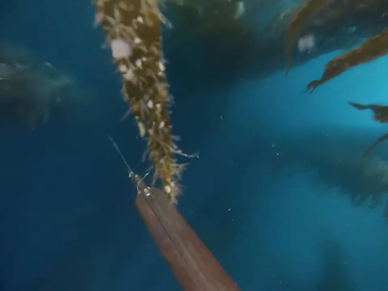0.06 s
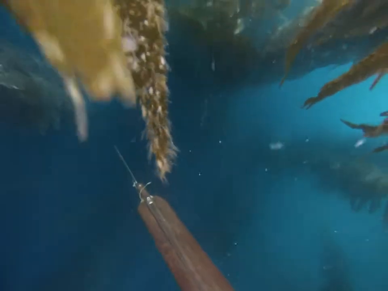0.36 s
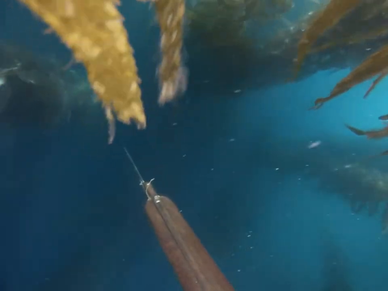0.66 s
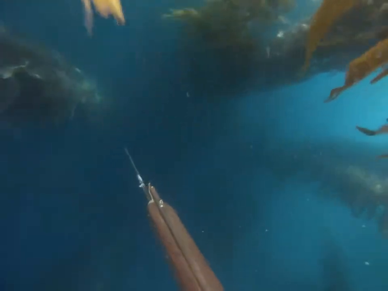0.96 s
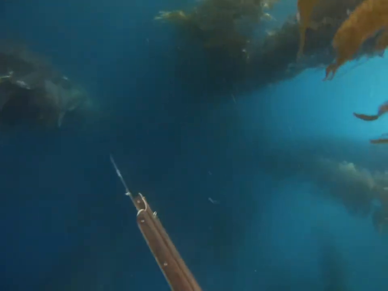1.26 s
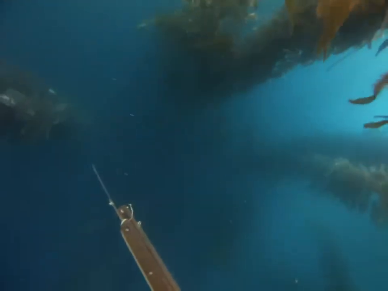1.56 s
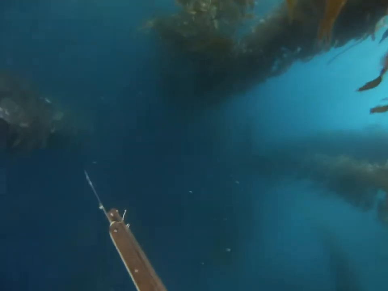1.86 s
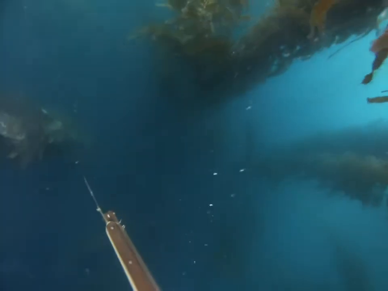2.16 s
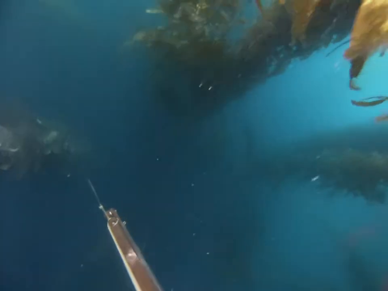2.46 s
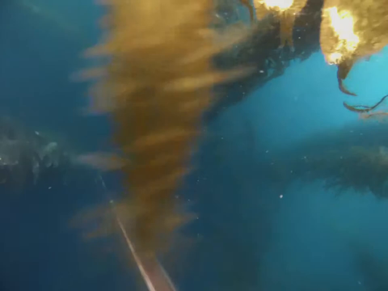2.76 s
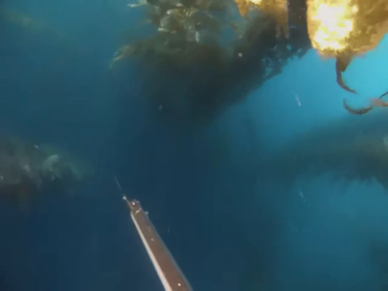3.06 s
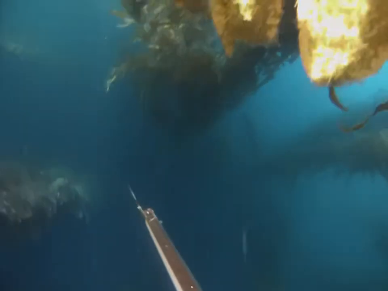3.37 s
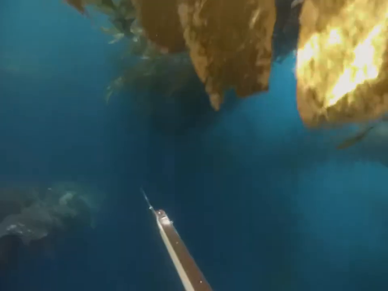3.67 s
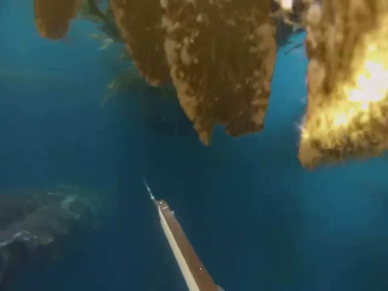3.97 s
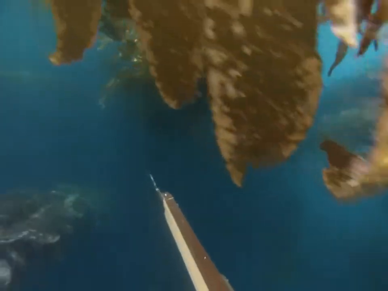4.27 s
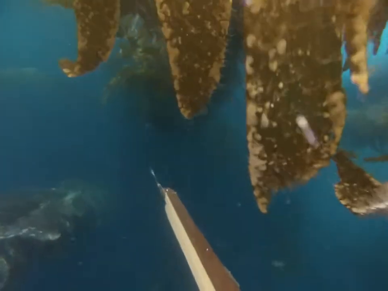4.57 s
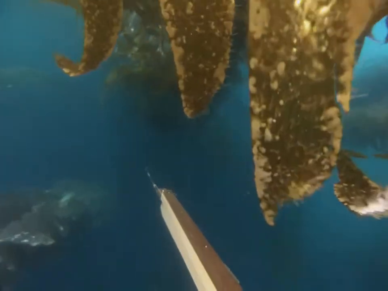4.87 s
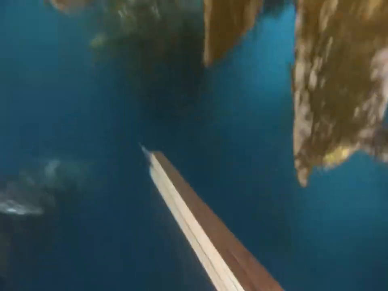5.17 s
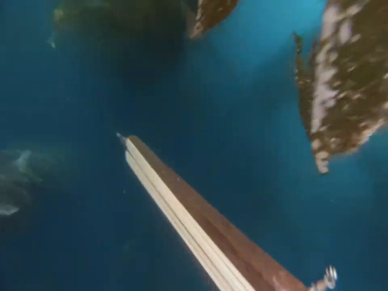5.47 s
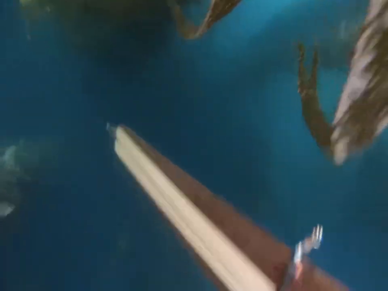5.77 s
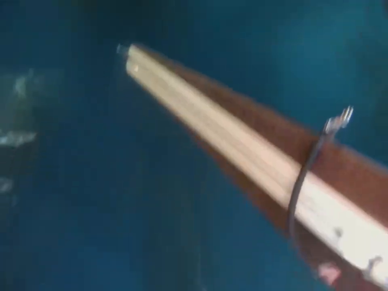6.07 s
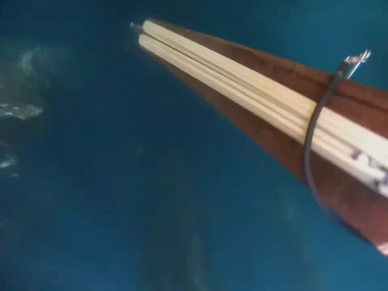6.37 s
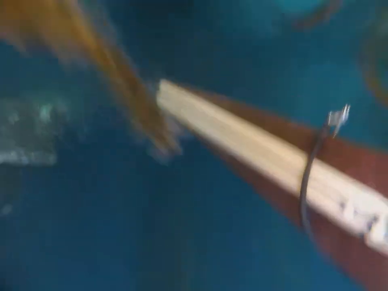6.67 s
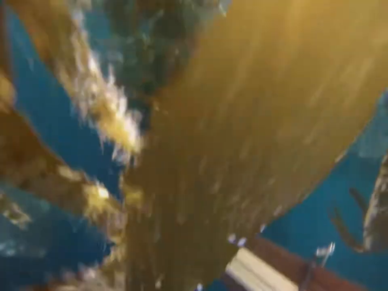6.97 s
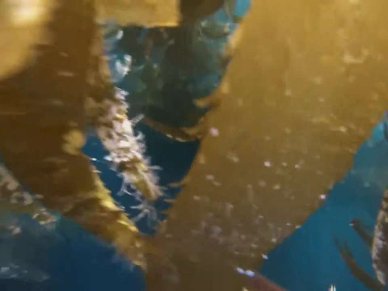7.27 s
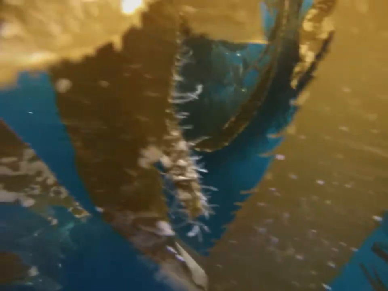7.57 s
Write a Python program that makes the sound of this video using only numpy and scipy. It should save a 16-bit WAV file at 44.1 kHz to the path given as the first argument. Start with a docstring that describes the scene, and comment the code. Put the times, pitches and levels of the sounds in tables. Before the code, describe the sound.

Underwater in a kelp forest, heard from inside a camera housing. Water rumbles and gurgles softly while snapping shrimp fizz and click all around, a few snaps sharp and close. A frond patters and brushes over the case, squeezing out bubbles. Later the flow surges, a speargun gives deep thumps and knocks, and a stiff kelp blade scrapes along the case before the water eases.

```python
"""A diver with a wooden speargun glides through a kelp forest, heard from inside a camera housing.
From the start water rumbles and gurgles past and snapping shrimp crackle all around; soft bumps and
bubbly swirls drift in. Just after 2 s a frond patters and brushes over the case, squeezing out bubbles.
From 5 s the flow surges, and around 6 s the gear thumps and knocks as the gun is drawn in.
Near 7 s a stiff kelp blade scrapes along the case, then the water eases under the shrimp."""
import sys
import numpy as np
from scipy import signal
from scipy.fft import rfft, irfft
from scipy.io import wavfile

SR = 44100
rng = np.random.default_rng(int(sys.argv[2]) if len(sys.argv) > 2 else 0)


def to_wav(sig):
    """Store sig (one row per channel, or 1-D mono) as 16-bit WAV at the path in sys.argv[1].

    Samples outside -1..1 are clipped; the rate is SR.
    """
    pcm = np.clip(np.atleast_2d(sig), -1, 1) * 32767
    pcm = np.round(pcm).astype(np.int16)
    wavfile.write(sys.argv[1], SR, pcm.T)  # frames by channels


N = 336483


def from_db(db):
    """Decibels to gain."""
    return 10 ** (np.asarray(db) / 20)


def rms_one(x):
    """Scale to unit rms."""
    return x / np.sqrt(np.mean(x ** 2) + 1e-20)


def peak_one(x):
    """Scale to unit peak."""
    return x / (np.abs(x).max() + 1e-20)


def add(out, s, sound):
    """Mix a sound in at s seconds."""
    start = max(round(s * SR), 0)
    out[start:start + len(sound)] += sound[:N - start]


def automation(points):
    """A fader ride: straight lines between (time, level) points."""
    return np.interp(np.arange(N) / SR, *np.transpose(points))


def band(x, hz, kind="band", order=2):
    """Butterworth filter."""
    return signal.sosfilt(signal.butter(order, np.minimum(hz, .45 * SR), kind, fs=SR, output="sos"), x)


def colour(x, curve, size=8192):
    """Minimum-phase EQ through (frequency, level) points."""
    hz, db = np.transpose(curve)
    log_hz = np.log(np.maximum(np.arange(size // 2 + 1) * SR / size, 1))
    cepstrum = irfft(np.log(from_db(np.interp(log_hz, np.log(hz), db))))
    cepstrum[1:size // 2] *= 2
    cepstrum[size // 2 + 1:] = 0
    return signal.fftconvolve(x, irfft(np.exp(rfft(cepstrum))))[:len(x)]


def resonance(x, hz, width):
    """Two-pole resonance with unit gain at its peak."""
    r = np.exp(-np.pi * width / SR)
    poles = [1, -2 * r * np.cos(2 * np.pi * hz / SR), r * r]
    return signal.lfilter(np.array([1, 0, -1]) * (1 - r * r) / 2, poles, x)


def drift(hz):
    """Smooth random modulation, rms about 1."""
    hop, settle = 40, 2000
    r = np.exp(-2 * np.pi * hz * hop / SR)
    noise = rng.standard_normal(N // hop + settle + 2)
    slow = signal.lfilter([1], [1, -2 * r, r * r], noise)[settle:]
    return np.interp(np.arange(N) / hop, np.arange(len(slow)), rms_one(slow))


def lumpy(x, depth_db, rate_hz):
    """Make a sound swell and sink at random; rms 1."""
    return rms_one(x * from_db(depth_db * np.clip(drift(rate_hz), -2, 2)))


def grains(per_s, spread_db, largest):
    """Random clicks, many small and a few large."""
    sizes = from_db(spread_db * np.minimum(rng.exponential(1, N), largest)) * rng.choice([-1, 1], N)
    return sizes * (rng.random(N) < per_s / SR)


def dying_noise(t60, size=6000):
    """A tail of reflections with unit energy."""
    tail = rng.standard_normal(size) * from_db(-60 * np.arange(size) / SR / t60)
    return tail / np.linalg.norm(tail)


def click(scatter_db, t60):
    """A direct pressure dip and its close reflections."""
    pulse = from_db(scatter_db) * dying_noise(t60)
    pulse[0] -= 1
    return pulse


def with_treble(x, treble_db, split_hz, order):
    """Balance a hit's top end against its body; peak 1."""
    body = peak_one(band(x, split_hz, "low", order))
    treble = peak_one(band(x, split_hz, "high", order))
    return peak_one(body + from_db(treble_db) * treble)


# Strength of the flow past the housing: t/s, level/dB
FLOW_RIDE = [(0.0, -56), (0.25, -58), (0.66, -50.5), (1.1, -53), (2.21, -55.5), (2.42, -49.5), (2.7, -49),
             (3.16, -50), (3.8, -51), (4.0, -49.5), (5.04, -47), (5.5, -37.5), (5.91, -42.5), (6.18, -35),
             (6.61, -39), (6.89, -31.5), (7.25, -46), (7.63, -44.5)]
# EQ of the rolling low end: f/Hz, level/dB
RUMBLE_EQ = [(14, -23.5), (24, -3), (43, -7.5), (70, -6.5), (107, -16), (140, -15), (170, -18),
             (240, -26.5), (370, -80.5)]
# EQ of the throaty midrange gurgle: f/Hz, level/dB
GURGLE_EQ = [(220, -40.5), (380, 6.5), (480, 5.5), (720, 7.5), (950, 0), (1250, -0.5), (1500, -1.5),
             (2000, -60.5)]
def water():
    """The current rocks the case, rumbles, sheds eddies and gurgles round the gear, rising with flow."""
    surge_db = automation(FLOW_RIDE) + 50  # 0 dB is a steady glide
    white = rng.standard_normal((3, N))
    sway = rms_one(band(white[0], [9, 17]))
    rumble = lumpy(colour(white[1], RUMBLE_EQ), depth_db=2.5, rate_hz=31)
    eddies = lumpy(band(white[2], [142, 310]), depth_db=7, rate_hz=74)
    pops = grains(per_s=4000, spread_db=3.5, largest=1.33)
    gurgle = lumpy(colour(pops, GURGLE_EQ), depth_db=2.5, rate_hz=37)
    return (from_db(-38.5 + .55 * surge_db) * sway
            + from_db(-45 + .79 * surge_db) * rumble
            + from_db(-59 + .9 * surge_db) * eddies
            + from_db(-63 + .43 * surge_db) * gurgle)


# Fader ride of the distant shrimp: t/s, level/dB
SHRIMP_RIDE = [(0, 1), (1.9, 1), (3.0, 2.5), (3.7, 2), (4.5, 1.5), (5.2, 1.5), (6.4, 3.5), (7.63, 0)]
# EQ of their fizz and crackle: f/Hz, level/dB
SHRIMP_EQ = [(590, -25.5), (1000, -8), (1380, -15.5), (1600, 0), (2000, -4), (2310, 2), (2740, -10.5),
             (3700, -7.5), (4790, -16.5), (5360, -7), (6130, -14), (7090, -9), (8380, -19), (10700, -14.5),
             (14500, -23.5)]
def shrimp_bed():
    """Countless far snaps merge into a fizz; nearer ones stand out in flurries of crackle."""
    far_snaps = rms_one(colour(grains(per_s=5000, spread_db=2.8, largest=3), SHRIMP_EQ))
    fizz = from_db(-60.5) * lumpy(far_snaps, depth_db=2, rate_hz=46)
    flurries = from_db(-63.5) * lumpy(crackle(SHRIMP_EQ), depth_db=3.5, rate_hz=5.6)
    return from_db(automation(SHRIMP_RIDE)) * band(fizz + flurries, 12100, "low", order=4)


def crackle(eq):
    """Mid-distance snaps: soft ticks coloured by direction, many faint and a few clear; rms 1."""
    ticks = [peak_one(band(colour(click(scatter_db=7, t60=.018), eq), [hz / 1.7, hz * 1.7]))
             for hz in np.geomspace(1800, 9000, num=40)]
    out = np.zeros(N)
    for when, direction, faintness in rng.random((1100, 3)):
        db = 4.6 * min(-np.log(faintness), 2.6)
        add(out, when * (N - 1) / SR, from_db(db) * ticks[int(direction * len(ticks))])
    return rms_one(out)


# Foreground shrimp snaps: t/s, peak level/dB, treble re body/dB, ring tilt/(dB per octave)
SNAP_CUES = [(0.0656, -34.5, -2, -3), (0.106, -40.5, 5, 4), (0.4592, -16.5, -14, 1), (0.6587, -39.5, 3, 2),
             (0.694, -43.5, 7, 8), (0.7434, -43.5, 10, 11), (0.8153, -39, 4, 9), (0.844, -42.5, -4, -18),
             (1.122, -30, -14, -7), (1.166, -32, -7, 19), (1.193, -23.5, -19, -2), (1.276, -41, -1, 1),
             (1.4716, -38, -7, 11), (1.73, -39, -9, 6), (1.8455, -33.5, -17, 0), (1.9449, -40, -19, -10),
             (2.0168, -37.5, -11, -3), (2.0982, -35, -19, 2), (2.841, -38.5, -7, -1), (2.9405, -37, 1, -19),
             (2.963, -16, -24, 5.5), (2.9924, -30.5, -7.5, -23), (3.3164, -36, 1, 7),
             (3.5039, -26, -11.5, -11.5), (3.551, -38.5, -5, -13), (3.5811, -36, -12, -1),
             (3.596, -33.5, -11, -9), (3.6152, -35, -5, 13), (3.6385, -35, -25, -20),
             (3.6797, -33.5, -4, 2), (3.7277, -34.5, -20, 1), (3.761, -39, -7, 24),
             (3.862, -24.5, -12, -4.5), (3.9055, -33, 9, 2), (4.0313, -33, 2.5, 2), (4.0518, -34, 3.5, 7),
             (4.182, -34, -22, -1), (4.2842, -31, -5, 2), (4.3025, -35, 3, -4), (4.914, -35, 2.5, 4),
             (5.0152, -38, -2.5, -6), (5.084, -37, -3, 5), (5.1243, -38.5, -4, 5), (5.1685, -35, -13.5, -6),
             (5.29, -25, -12.5, -3), (5.348, -28.5, -4, -2), (5.405, -37, -19, -7),
             (5.4858, -24.5, -31, -3), (5.679, -33.5, -10, 5), (5.689, -32, -19, -7),
             (5.7492, -33.5, -7, -16), (5.83, -32, -8.5, 3), (6.1365, -31, -16, -20),
             (6.1519, -27, -12.5, -11), (6.1752, -32, -7, -22), (6.2506, -40, -8, 10),
             (6.2628, -36.5, -7, -18), (6.3717, -36, 5, 3), (7.1014, -35.5, -8, -10),
             (7.277, -38.5, -6, -9), (7.39, -35.5, -5, 7), (7.448, -28.5, 0, -11),
             (7.5106, -32.5, -6.5, -20)]
def near_snaps():
    """Each claw snap rings the case; fainter ones come from farther off, more scattered by the kelp."""
    out = np.zeros(N)
    nearest_db = max(row[1] for row in SNAP_CUES)
    for s, db, treble_db, tilt_db in SNAP_CUES:
        loss_db = nearest_db - db
        scatter_db = min(-13 + .6 * loss_db, -1)
        pulse = click(scatter_db, t60=.018) + from_db(scatter_db - 5) * dying_noise(t60=.14)
        glitter = band(dying_noise(t60=.054), 3800, "high", order=6)  # short waves scatter most
        spread_db = min(1 + loss_db / 6, 4)
        ring = housing(pulse + from_db(-1.5) * glitter, spread_db, tilt_db)
        front_wall = from_db(-8 - loss_db / 2) * resonance(ring, hz=2290, width=280)
        add(out, s, from_db(db) * with_treble(ring + front_wall, treble_db, split_hz=4350, order=12))
    return out


# Ring of the housing walls: f/Hz, bandwidth/Hz, level/dB
WALL_MODES = [(797, 75, -16), (1647, 170, -1), (2199, 174, 4.5), (2420, 164, 3), (2930, 1000, -9.5),
              (3705, 225, -4), (5360, 405, -11), (7090, 670, -14.5), (9930, 540, -21)]
def housing(x, spread_db, tilt_db):
    """Sound from the water rings the walls; each direction has its own mix, tilted dark or bright."""
    octaves = np.clip(np.log2(np.array(WALL_MODES)[:, 0] / 2300), -1, 2 / 3)
    trim_db = spread_db * rng.uniform(-1.4, 1, len(WALL_MODES)) + tilt_db * octaves
    return sum((-1) ** k * from_db(db + trim_db[k]) * resonance(x, hz, width)
               for k, (hz, width, db) in enumerate(WALL_MODES))


# Soft, bassy bumps through the mount: t/s, peak level/dB, f/Hz
THUMP_CUES = [(0.711, -30, 80), (2.251, -26, 66), (2.271, -33, 109), (2.325, -27, 60), (2.423, -27, 75),
              (3.4, -25, 48.3), (3.879, -25.5, 69.5), (4.019, -32, 159), (4.41, -35, 143),
              (5.57, -31, 69.4), (5.964, -28.5, 86.4), (6.225, -9.5, 109.5), (6.293, -17, 102),
              (6.379, -10.5, 105), (6.438, -13, 98), (6.674, -21, 70), (6.746, -22.5, 69),
              (6.9898, -21, 215), (6.993, -9.5, 61), (7.081, -21.5, 107)]
def thumps(length_s=.013):
    """Soft pushes on the mount swell and die within a few cycles."""
    out, t = np.zeros(N), np.arange(-SR // 10, SR // 10) / SR
    swell = np.exp(-(2 * t / length_s) ** 2)
    for s, db, hz in THUMP_CUES:
        add(out, s + t[0], -from_db(db) * np.cos(2 * np.pi * hz * t) * swell)
    return out


def bubble(hz, cycles, size=2000):
    """A bubble pings and chirps upward, dying by 60 dB in cycles / hz seconds."""
    turns = hz * np.arange(size) / SR
    return np.sin(2 * np.pi * turns * (1 + .15 * turns / cycles)) * from_db(-60 * turns / cycles)


def bubbling(count, hz, octaves, spread_db, cycles, size):
    """Bubbles of assorted sizes born at random moments; rms 1."""
    out = np.zeros(size)
    for when, pitch, faintness in rng.random((count, 3)):
        ring = from_db(-spread_db * faintness) * bubble(hz * 2 ** (octaves * (pitch - .5)), cycles)
        start = int(when * size)
        out[start:start + len(ring)] += ring[:size - start]
    return rms_one(band(out, [hz / 2, hz * 2]))


# Bubbly swirls: t/s, rms level at the crest/dB, f/Hz, length/s, pitch spread/octaves
SWIRL_CUES = [(1.594, -49.5, 1180, 0.035, 2.4), (1.661, -54, 1300, 0.026, 0.85),
              (2.741, -52, 740, 0.066, 1.8), (2.814, -47, 885, 0.01, 2), (3.095, -53, 1240, 0.062, 2.14),
              (4.091, -54, 268, 0.14, 0.64), (4.679, -55.5, 374, 0.25, 1.1),
              (4.415, -54.5, 714, 0.085, 0.39), (4.54, -55.5, 736, 0.092, 0.56),
              (4.683, -45, 700, 0.051, 0.38), (5.32, -55, 634, 0.27, 2.03),
              (5.452, -44.5, 604, 0.026, 0.85), (5.567, -45.5, 730, .02, 1),
              (5.727, -49.5, 750, 0.097, 0.8), (5.916, -53, 755, 0.056, 0.88),
              (6.031, -51, 614, 0.055, 0.65), (6.165, -49.5, 700, 0.14, 0.71),
              (6.487, -50.5, 543, .04, 0.89), (6.598, -49.5, 1150, 0.06, 0.18),
              (6.639, -46.5, 690, 0.06, 0.68), (6.996, -37, 685, 0.011, 0.19), (7.087, -53, 1060, 0.056, 1),
              (7.141, -42, 770, 0.0081, 0.89), (7.207, -55, 1130, 0.066, 0.95)]
def swirls():
    """Eddies churn the water and shake loose clusters of little bubbles, swelling and fading."""
    out, t = np.zeros(N), np.arange(-SR // 5, SR // 5) / SR
    for s, db, hz, length, octaves in SWIRL_CUES:
        cluster = bubbling(count=200, hz=hz, octaves=octaves, spread_db=36, cycles=15.4, size=len(t))
        edges_hz = hz * 2 ** (octaves * np.array([-.5, .5]))
        churn = rms_one(band(rng.standard_normal(len(t)), edges_hz))
        swell = np.exp(-2 * (t / length) ** 2)
        add(out, s + t[0], from_db(db) * rms_one(cluster + from_db(-3.5) * churn) * swell)
    return out


# Kelp pattering on the case: t/s, peak level/dB, treble re body/dB
TAP_CUES = [(2.2268, -34, -16), (2.2513, -23.5, 3), (2.2823, -26, -4), (2.311, -20.5, -3),
            (2.344, -18.5, -7), (2.3786, -22, -1), (2.398, -18, 5), (2.42, -29, -2), (2.4305, -18.5, 0.5),
            (2.4485, -22, -3), (2.478, -21, -3), (2.5135, -20.5, 2), (2.581, -17.5, -5), (6.8624, -26, 5),
            (6.959, -30, 9)]
# EQ of a direct hit on the case: f/Hz, level/dB
TAP_EQ = [(88, 0), (150, 10), (285, 0), (420, -3), (722, -2), (844, -14), (2180, 2), (7710, -29),
          (8490, -33.5), (9600, -27.5), (13000, -40), (15500, -61)]
def kelp_taps():
    """Floats and stalks hit the case directly: a sharp, wide click over a short dull thud."""
    out = np.zeros(N)
    for s, db, treble_db in TAP_CUES:
        pulse = click(scatter_db=-5, t60=.009)
        thud = band(dying_noise(t60=.035), [450, 1600])
        tap = colour(pulse + from_db(3) * thud, TAP_EQ)
        add(out, s, from_db(db) * with_treble(tap, treble_db, split_hz=6040, order=4))
    return out


# Gear and stalks knocking on the case: t/s, peak level/dB, hardness as low-pass f/Hz
KNOCK_CUES = [(2.228, -31, 700), (2.321, -33, 650), (2.3885, -26.5, 800), (2.4175, -29, 600),
              (2.502, -31, 800), (2.556, -32.5, 900), (3.075, -33.5, 900), (4.011, -39, 400),
              (4.128, -39, 348), (4.163, -39, 350), (4.405, -33.5, 500), (5.9548, -19.5, 1080),
              (5.961, -28, 800), (5.9672, -27, 1000), (6.1115, -27, 1000), (6.1315, -26, 1000),
              (6.517, -24.5, 890), (6.9857, -12, 1300)]
# Low modes of the case on its mount: f/Hz, bandwidth/Hz, level/dB
MOUNT_MODES = [(184, 140, 6), (376, 38, -7), (630, 69, -0.5), (1170, 170, -13)]
def knocks():
    """One short push sets the low modes of the case ringing; the water damps them quickly."""
    out = np.zeros(N)
    for s, db, hardness_hz in KNOCK_CUES:
        push = -band(click(scatter_db=-10.5, t60=.013), hardness_hz, "low")
        ring = sum(from_db(mode_db + rng.normal(0, .96)) * resonance(push, hz, width)
                   for hz, width, mode_db in MOUNT_MODES)
        add(out, s, from_db(db) * peak_one(ring))
    return out


def pressing(cues, attack_s=.06, release_s=.042, sag_db_per_s=14):
    """Envelope of a run of contacts: each catches, eases while it holds, and lets go."""
    t, out = np.arange(N) / SR, np.zeros(N)
    for s, length, db in cues:
        away = np.maximum((s - t) / attack_s, (t - s - length) / release_s)
        sag_db = sag_db_per_s * np.clip(t - s, 0, length)
        out = np.maximum(out, from_db(db - sag_db - 60 * np.clip(away, 0, 2)))
    return out


def stick_slip():
    """Rough blades catch and slip: fine slips outnumber coarse ones, each size in its own bursts."""
    out = np.zeros(N)
    for hz in 250 * 2 ** np.arange(6):
        per_s = 400 + hz / 2
        slips = band(grains(per_s, spread_db=4.6, largest=2.4), [hz, 2 * hz]) / np.sqrt(per_s)
        out += slips * from_db(3 * np.clip(drift(hz=130), -2, 1.5))
    return out


# Strokes of the soft frond: t/s, length/s, fader level/dB
BRUSH_CUES = [(2.238, 0.0094, -33.5), (2.268, 0.019, -43), (2.304, 0.037, -43), (2.378, 0.026, -33.5),
              (2.41, 0.064, -38), (2.486, 0.041, -35.5), (2.53, 0.03, -43), (2.58, 0.13, -43.5)]
# Strokes of the stiff blade: t/s, length/s, fader level/dB
SCRAPE_CUES = [(6.6, 0.12, -49.5), (6.71, 0.053, -43), (6.783, 0.014, -42), (6.848, .008, -43.5),
               (6.861, 0.013, -33.5), (6.884, 0.043, -34), (6.935, 0.011, -36), (6.949, .004, -36),
               (6.959, 0.0094, -33.5), (6.992, 0.024, -32), (7.024, .004, -40), (7.033, 0.0075, -40),
               (7.052, 0.016, -46), (7.1, 0.036, -49)]
# EQ of kelp sliding on the case: f/Hz, level/dB
RUB_EQ = [(200, -18), (400, -8.5), (1200, -12), (2100, -1), (2750, -15), (3250, -8.5), (3550, -4),
          (4050, -26), (4800, -16), (6000, -18), (8400, -25), (10500, -24.5), (13000, -37), (15500, -51)]
# Wall modes that sing under a hard scrape: f/Hz, bandwidth/Hz, level/dB
SINGING_MODES = [(1210, 110, -11), (2160, 86, -22), (3516, 98, -7.5), (5900, 230, -22),
                 (10050, 1100, -27.5)]
def kelp_rubbing():
    """A soft frond brushes the case, later a stiff blade scrapes it; both squeeze out froth."""
    froth = bubbling(count=2600, hz=1430, octaves=2.28, spread_db=17, cycles=14, size=N)
    grit = stick_slip()
    slips = lumpy(colour(grit, RUB_EQ), depth_db=2.2, rate_hz=110)
    # The frond is muffled and drags water along with a low glug.
    glug = lumpy(band(rng.standard_normal(N), [50, 150]), depth_db=6, rate_hz=37)
    swish = from_db(-13) * band(slips, 2950, "low", order=3) + from_db(-17) * slips
    frond = swish + from_db(-16.5) * froth + from_db(-5.5) * glug
    # The harder the blade presses, the brighter the rasp and the more the walls sing.
    scrape = pressing(SCRAPE_CUES)
    pressure = scrape / scrape.max()
    dull = band(slips, 4400, "low", order=1)
    rasp = dull + from_db(1) * np.sqrt(pressure) * (slips - dull)
    singing = sum(from_db(db) * rms_one(resonance(grit, hz, width)) for hz, width, db in SINGING_MODES)
    blade = from_db(-.5) * rasp + pressure * singing + from_db(-5) * froth
    return pressing(BRUSH_CUES) * frond + scrape * blade


# Single bubbles squeezed out of kelp and gear: t/s, level/dB, f/Hz, ring/cycles
BUBBLE_CUES = [(2.2498, -14.5, 1880, 18), (2.377, -31.5, 10200, 45), (2.389, -26, 1570, 19),
               (2.4905, -23, 1560, 15), (2.5063, -31, 2050, 55), (5.6, -21, 830, 11.6),
               (5.675, -25, 960, 20), (5.6787, -31, 1280, 12), (5.683, -28, 660, 12),
               (6.617, -28.5, 1110, 36), (6.961, -14.5, 1870, 26), (6.9905, -28, 10000, 45),
               (7.026, -24, 1900, 21), (7.035, -26, 1380, 24)]
def loose_bubbles(tap_hz=1610, spread_octaves=.77, max_delay_s=.0054):
    """Single bubbles ping close to the case: a few clear ones, and a small one freed by each tap."""
    out = np.zeros(N)
    for s, db, hz, cycles in BUBBLE_CUES:
        add(out, s, from_db(db) * bubble(hz, cycles))
    for s, tap_db, _ in TAP_CUES:
        late, pitch = rng.random(2)
        hz = tap_hz * 2 ** (spread_octaves * (pitch - .5))
        add(out, s + max_delay_s * late, from_db(tap_db - 5.5) * bubble(hz, cycles=6))
    return out


def scene():
    """The sea bed of sound and the close contacts meet at one microphone inside the case."""
    sea = water() + swirls() + shrimp_bed() + near_snaps()
    contact = kelp_taps() + kelp_rubbing() + loose_bubbles() + thumps() + knocks()
    return (sea + contact)[None]


def record(dry):
    """A steep high cut at 15.3 kHz takes off the very top."""
    return signal.sosfilt(signal.ellip(10, .1, 80, 15300, fs=SR, output="sos"), dry)


dry = scene()
out = record(dry)
to_wav(out)
```